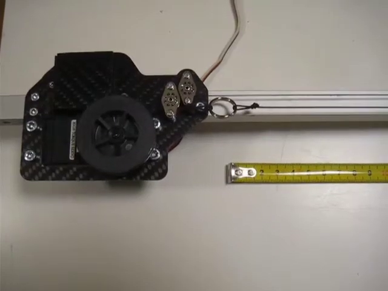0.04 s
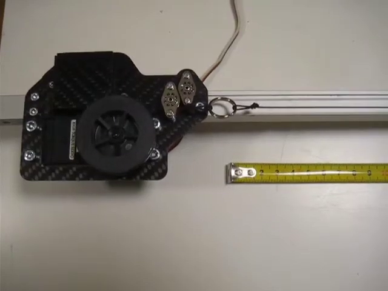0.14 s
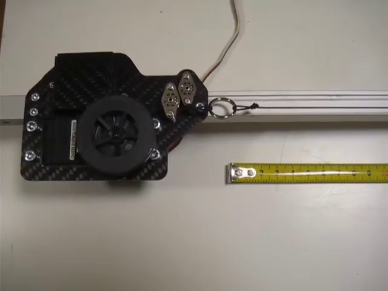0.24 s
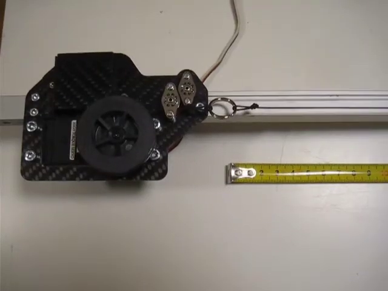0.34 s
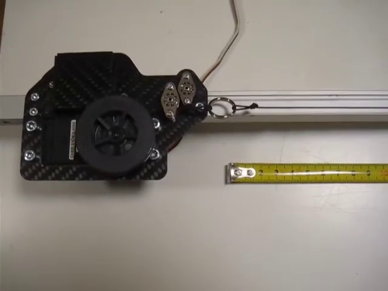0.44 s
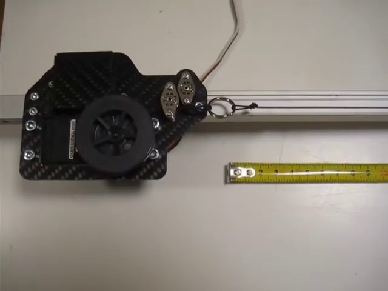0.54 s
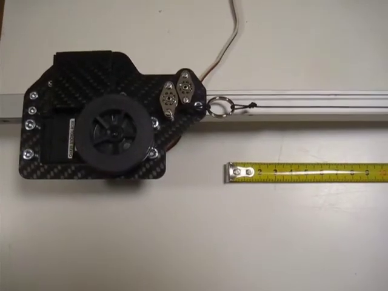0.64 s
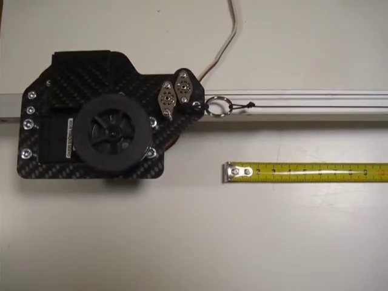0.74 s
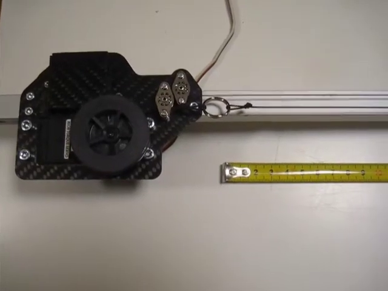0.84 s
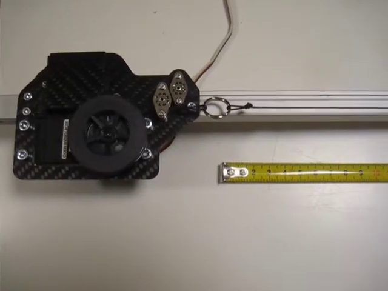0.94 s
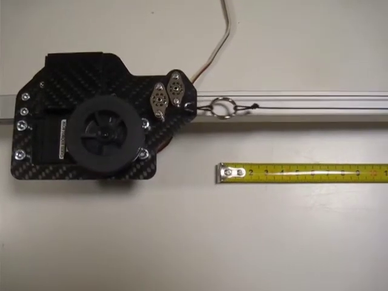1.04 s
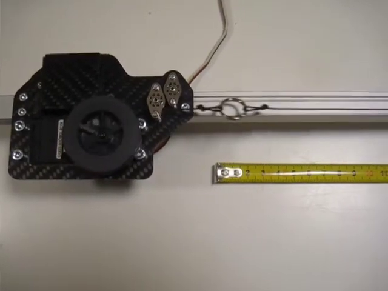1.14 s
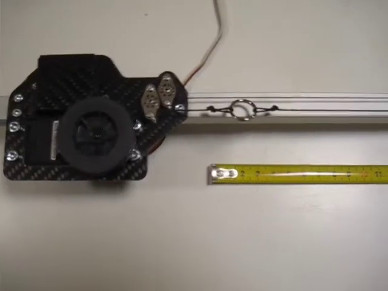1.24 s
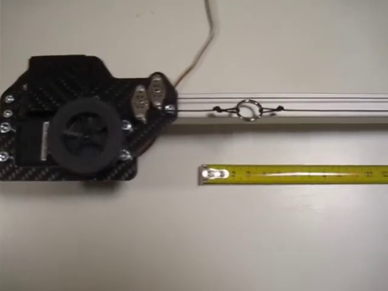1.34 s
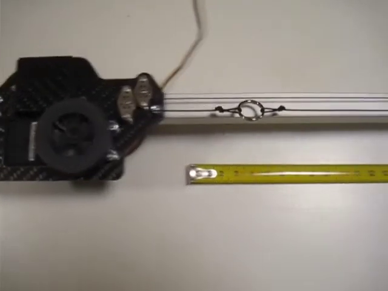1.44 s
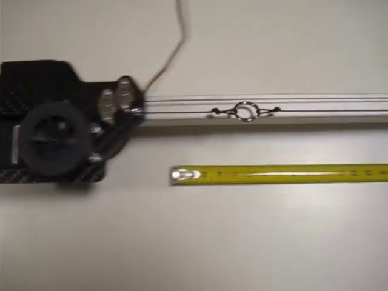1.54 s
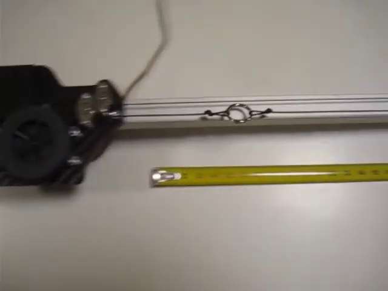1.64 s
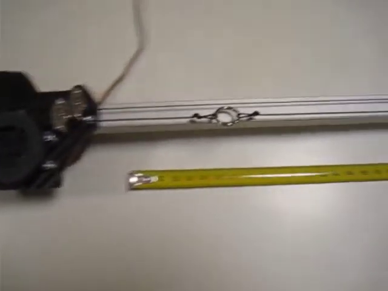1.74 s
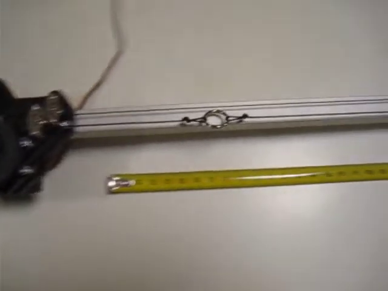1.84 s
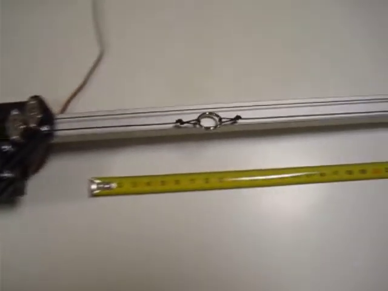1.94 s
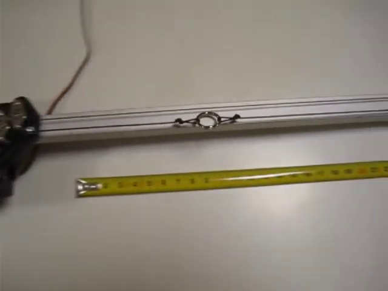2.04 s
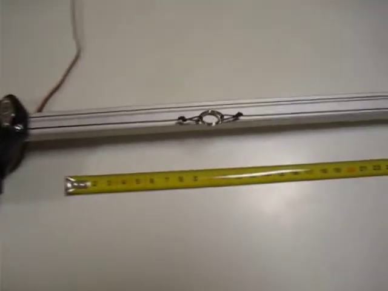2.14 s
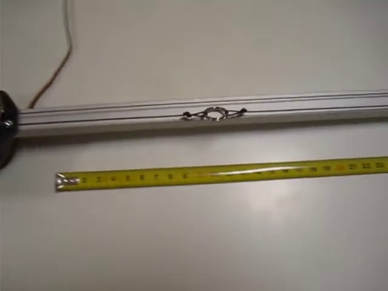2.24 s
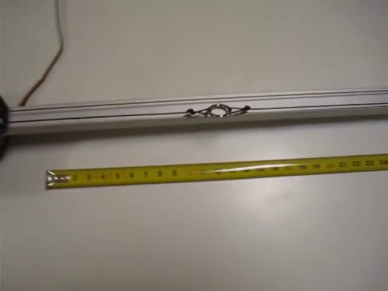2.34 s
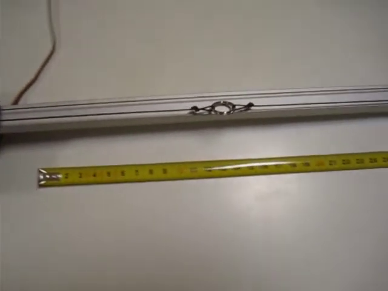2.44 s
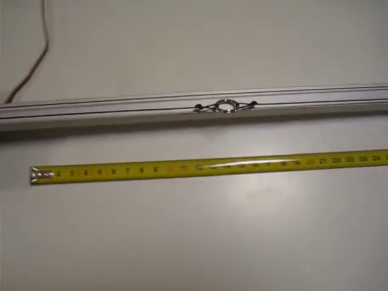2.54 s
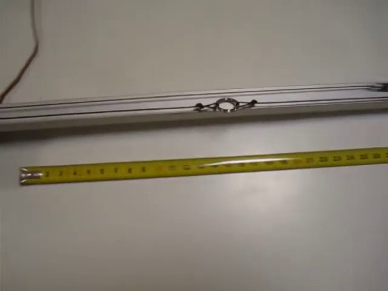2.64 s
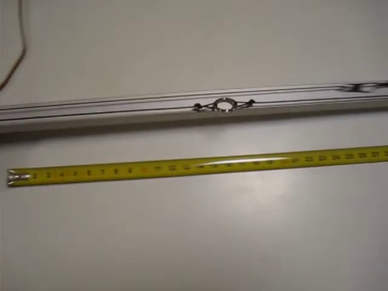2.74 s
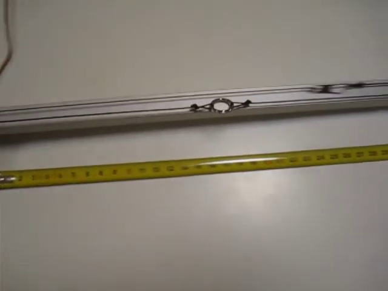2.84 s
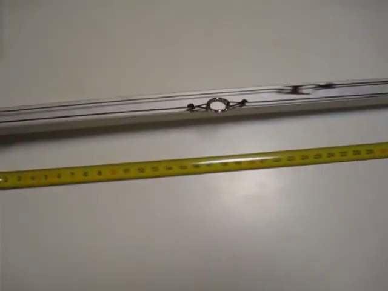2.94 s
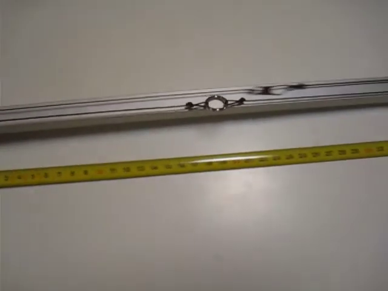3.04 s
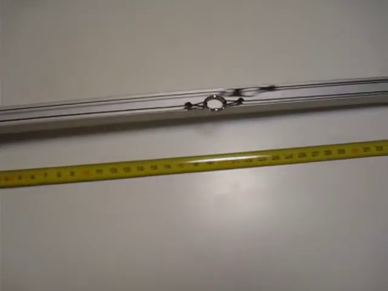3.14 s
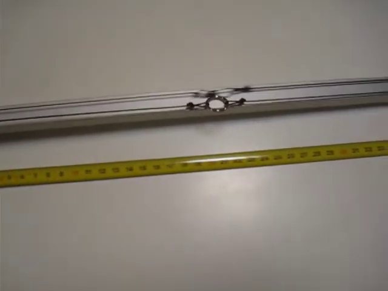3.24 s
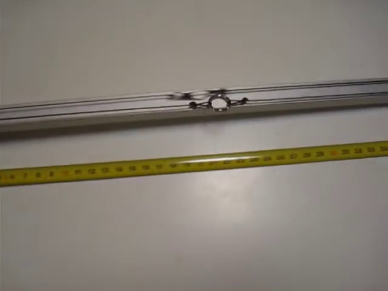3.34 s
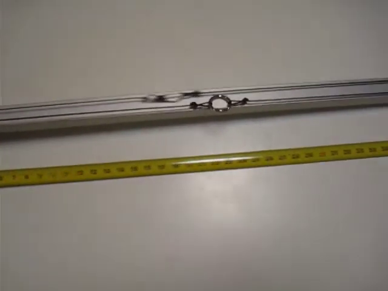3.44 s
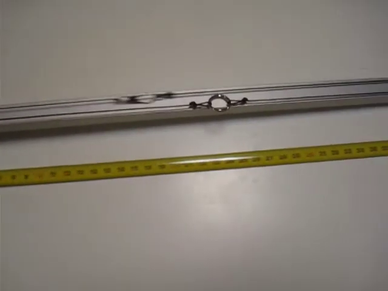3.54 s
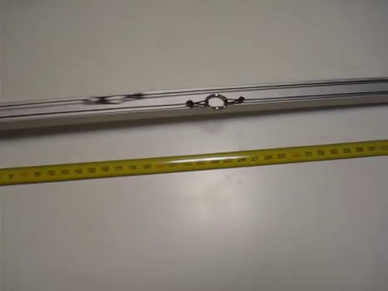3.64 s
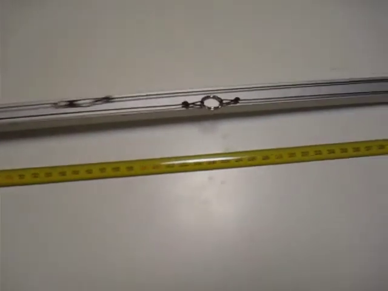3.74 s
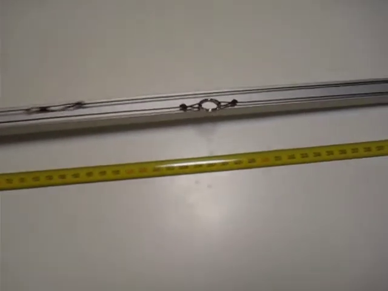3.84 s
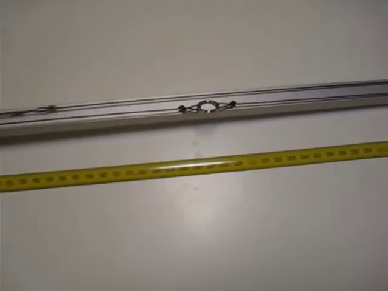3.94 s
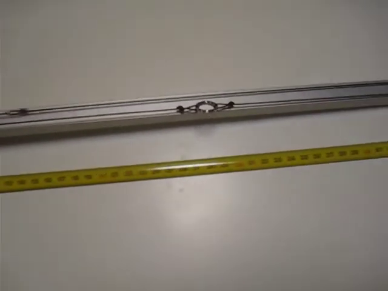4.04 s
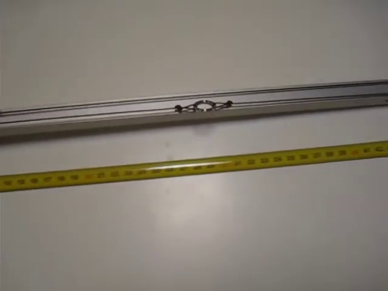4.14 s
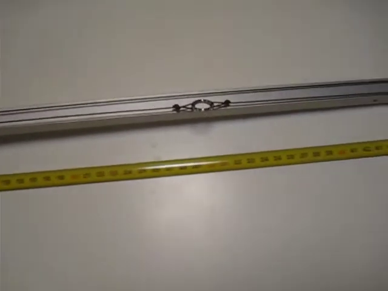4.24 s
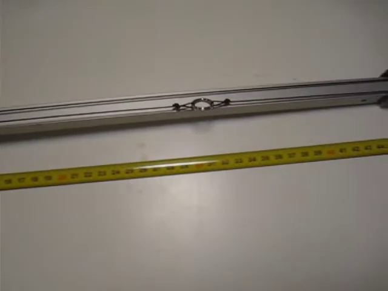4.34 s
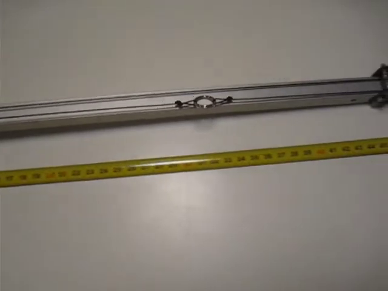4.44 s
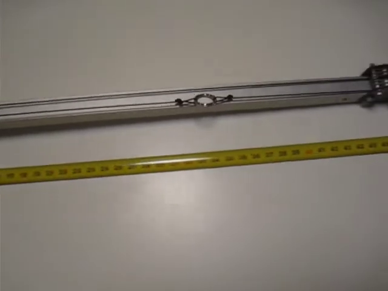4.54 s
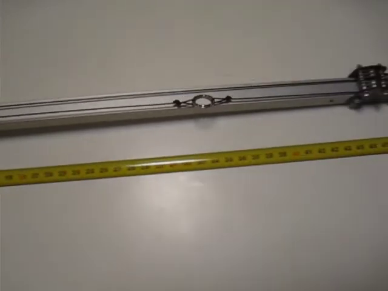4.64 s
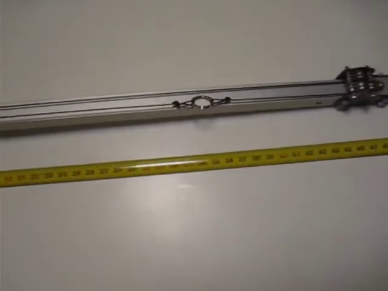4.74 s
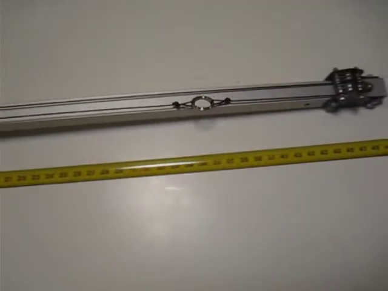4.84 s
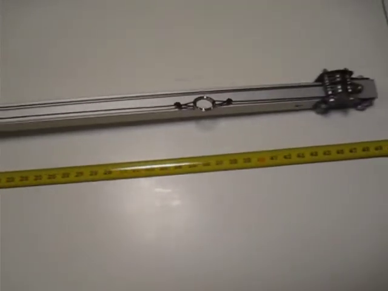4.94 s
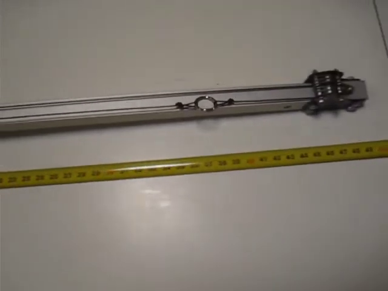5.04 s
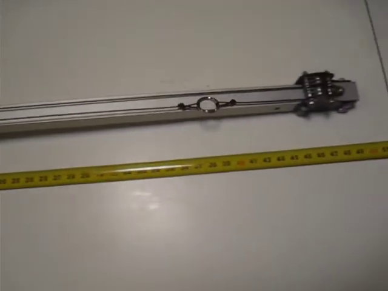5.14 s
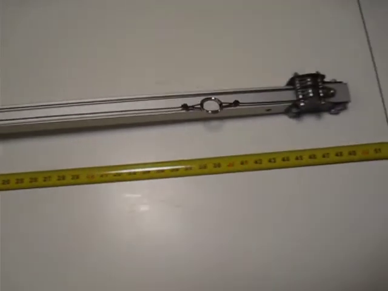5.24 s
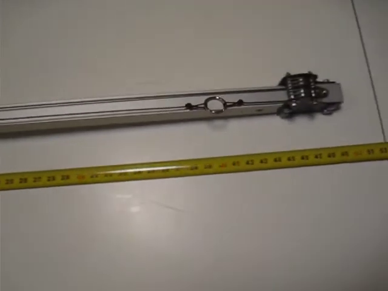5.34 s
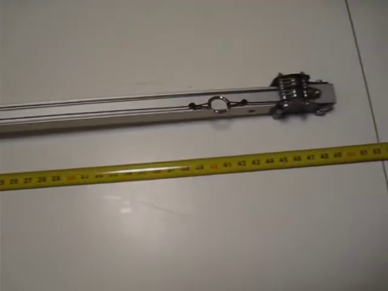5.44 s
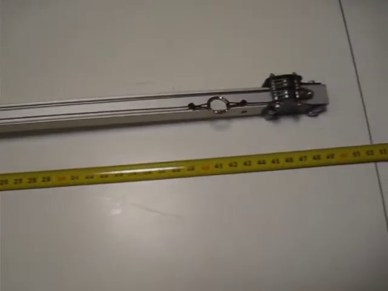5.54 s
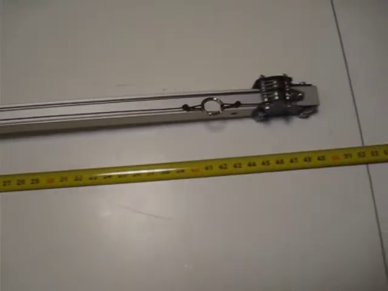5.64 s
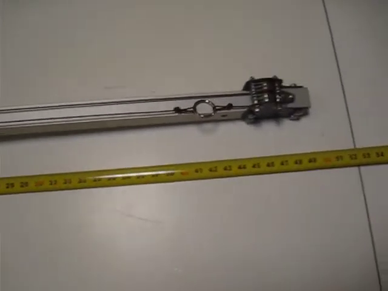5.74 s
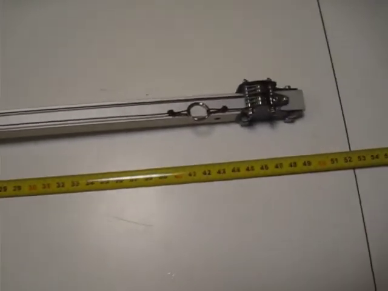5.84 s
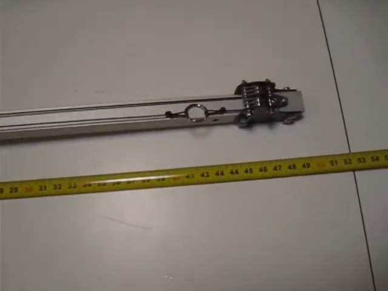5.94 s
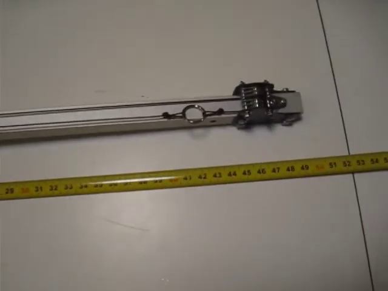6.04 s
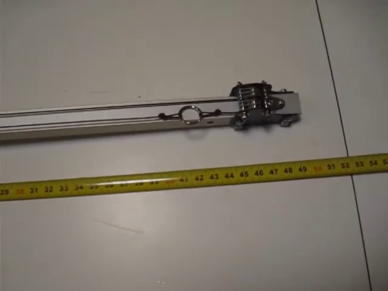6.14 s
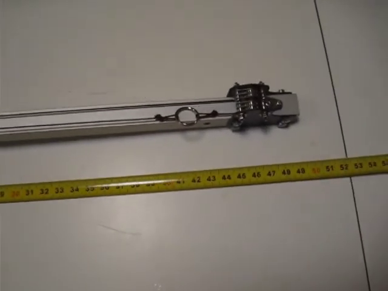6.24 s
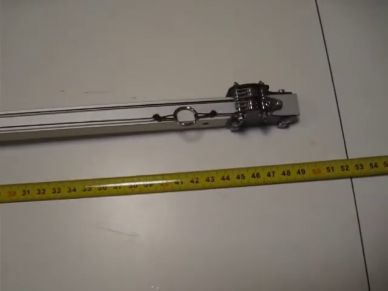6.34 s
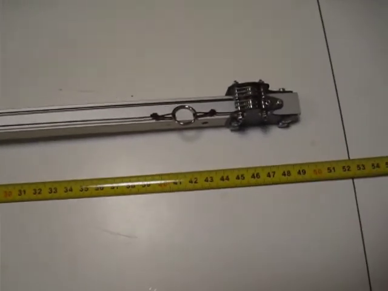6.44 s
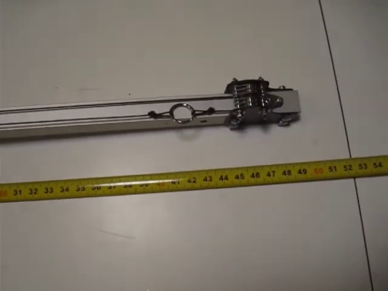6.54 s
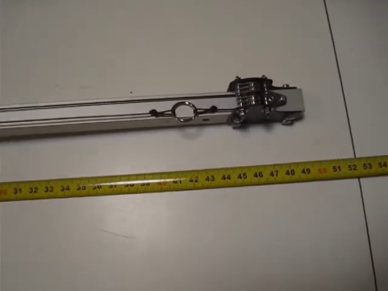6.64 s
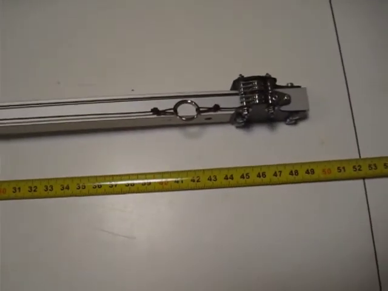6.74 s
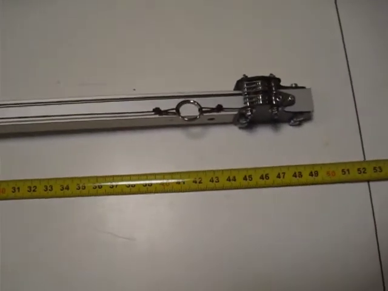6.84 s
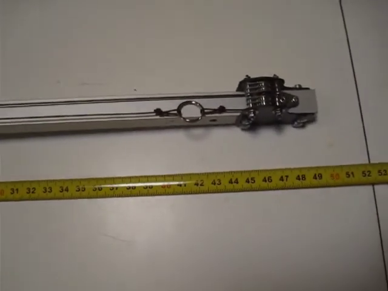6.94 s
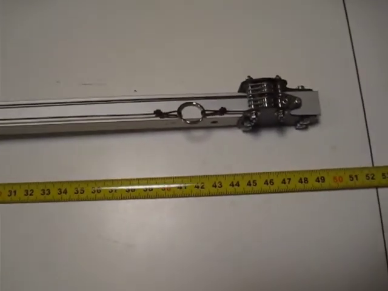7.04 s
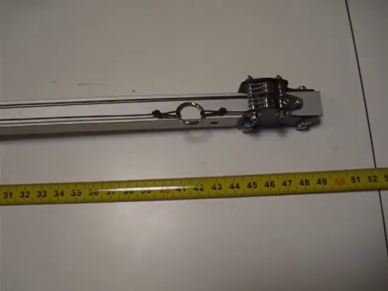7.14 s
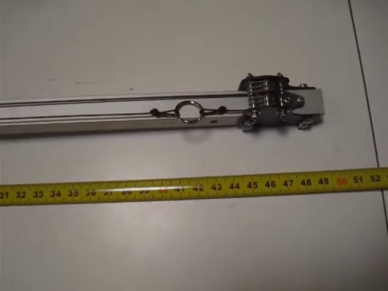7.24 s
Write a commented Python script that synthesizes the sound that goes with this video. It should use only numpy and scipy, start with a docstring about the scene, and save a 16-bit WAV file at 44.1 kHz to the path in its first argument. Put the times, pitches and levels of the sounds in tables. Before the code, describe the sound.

Close indoor sound of a small geared motor: near silence with faint ticking, a sudden start with an upward sweep and a burst of gear snaps, then a steady gritty rattle with a shrill whine and light hum, ringing through an aluminium rail. The tone shifts gently as the microphone moves along it. The motor coasts down quickly, and a tightened line ticks sparsely in its pulleys over quiet room hiss.

```python
"""A small geared electric winch on an aluminium rail spins up, hauls a line for about four seconds and coasts.
Its rotor hums and whines as sine tones tied to its speed; its gear teeth rattle as random knocks
that ring the rail and frame, while a microphone travels along the rail above a table.
A lens ticks, burrs and faint swishes pass before the start; the tightened line ticks in its pulleys afterwards.
Filtered noise makes the soft room hiss and its wavering fan tones."""
import sys
import numpy as np
from scipy import signal
from scipy.fft import rfft, irfft
from scipy.io import wavfile
from scipy.ndimage import uniform_filter1d

SR = 44100
rng = np.random.default_rng(int(sys.argv[2]) if len(sys.argv) > 2 else 0)


def unload_wav(signal):
    """Save mono or channel-first audio to the path in sys.argv[1] as 16-bit WAV at rate SR, clipped to [-1, 1]."""
    wavfile.write(
        sys.argv[1],
        SR,
        np.round(np.clip(np.atleast_2d(signal).T, -1, 1) * 32767).astype(np.int16),
    )


N = 321048
TIME = np.arange(N) / SR  # seconds

# moments in seconds: motor on, gears engage, power cut
ON_S, ENGAGE_S, OFF_S = 0.8875, 0.932, 5.31


def from_db(db):
    """Turn decibels into a gain."""
    return 10 ** (np.asarray(db) / 20)


def rms_one(x):
    """Scale a sound to an rms (average strength) of 1."""
    return x / np.sqrt(np.mean(x ** 2) + 1e-20)


def since(s):
    """Seconds gone by since time s; zero before it."""
    return np.maximum(TIME - s, 0)


def plateau(middle, half_length):
    """A curve near 1 around the middle, with soft edges that pass 1/2 at the half length."""
    return 1 / (1 + ((TIME - middle) / half_length) ** 8)


def nearness(s, passing_s=0.44):
    """Rises to 1 as the travelling microphone passes a loud spot at time s."""
    return 1 / (1 + ((TIME - s) / passing_s) ** 2)


def dying(start, t60):
    """Envelope of a blow: it starts at once and falls by 60 dB in t60 seconds."""
    age = TIME - start
    return (age >= 0) * from_db(-60 * np.clip(age / t60, 0, 4))


def drift(rate_hz):
    """Slow random wandering with spread 1, made from smoothed noise."""
    step = 40  # samples between the points of the slow curve
    r = np.exp(-2 * np.pi * rate_hz * step / SR)
    noise = rng.standard_normal(N // step + 2002)
    slow = signal.lfilter([1], [1, -2 * r, r * r], noise)[2000:]  # skip the filter's start
    return np.interp(np.arange(N) / step, np.arange(len(slow)), rms_one(slow))


def colour(x, spectrum):
    """Filter through the points of a spectrum without any sound ahead of the blow (minimum phase)."""
    size = 2 ** 12
    hz, db = np.transpose(spectrum)
    grid = np.maximum(np.arange(size // 2 + 1) * SR / size, 1)
    gain = from_db(np.interp(np.log(grid), np.log(hz), db))
    # folding the cepstrum onto positive times gives the minimum-phase filter
    cepstrum = irfft(np.log(gain))
    cepstrum[1:size // 2] *= 2
    cepstrum[size // 2 + 1:] = 0
    return signal.fftconvolve(x, irfft(np.exp(rfft(cepstrum))))[:N]


def resonance(x, hz, width_hz):
    """A single resonance: a band-pass filter with gain 1 at its top."""
    r = np.exp(-np.pi * width_hz / SR)
    feed = np.array([1, 0, -1]) * (1 - r * r) / 2
    ring = [1, -2 * r * np.cos(2 * np.pi * hz / SR), r * r]
    return signal.lfilter(feed, ring, x + 1e-18)


def noise_band(noise, hz, width_hz):
    """Noise sent twice through the same resonance, with an rms of 1."""
    return rms_one(resonance(resonance(noise, hz, width_hz), hz, width_hz))


def rotor_speed(half_speed_s=1.02, run_up_s=.082, coast_s=.185):
    """Turns per second: an S-shaped run-up, a haul that wavers very slightly, then coasting."""
    # rotor speed while hauling, creeping up as the line winds in [t/s, speed/turns per s]
    cruise_speed = [(1.5, 219.4), (1.8, 220.4), (3.65, 220.8), (4.7, 222)]
    s, turns_per_s = np.transpose(cruise_speed)
    cruise = np.interp(TIME, s, turns_per_s) * (1 + .0009 * drift(4))
    run_up = 1 / (1 + np.exp((half_speed_s - TIME) / run_up_s))
    coast = 1 / np.sqrt(1 + (since(OFF_S) / coast_s) ** 4)
    return cruise * run_up * coast


def drive(switch_rise_s=0.0069, fade_s=5.575, steep_s=5.71, fade_db_per_s=34, steep_db_per_s=149):
    """Gain of the whole drive: rising at the switch, eased while slack, held, then released."""
    # the gears overrun the line and run slack [middle t/s, half length/s, level/dB]
    slack = (1.222, 0.083, -2.5)
    middle, half_length, slack_db = slack
    switch = np.minimum(since(ON_S) / switch_rise_s, 1)
    # the fade steepens late in the coasting
    release_db = fade_db_per_s * since(fade_s) + steep_db_per_s * since(steep_s)
    return switch * from_db(slack_db * plateau(middle, half_length) - release_db)


def gears(speed, turns, contacts_per_turn=26, spread_db=3.5, flutter_db=0.58, rub=0.25):
    """Random tooth contacts of uneven strength, pressed harder once in each turn of every wheel."""
    # wheels slightly out of true [turns per rotor turn, swing of the rattle/dB]
    wheels = [(.0497, .8), (.1125, .7), (.1395, .6), (.2018, .7), (.2516, .7), (1, 1.6), (2, 1.1)]
    chance = contacts_per_turn * speed / SR  # of a contact in each sample
    sizes = from_db(spread_db * np.clip(rng.standard_normal(N), -3, 1.6))
    hits = (rng.random(N) < chance) * sizes * rng.choice([-1, 1], N)
    force = hits / np.sqrt(chance) + rub * rng.standard_normal(N)
    press_db = sum(swing_db * np.sin(2 * np.pi * (ratio * turns + rng.random()))
                   for ratio, swing_db in wheels)
    return parts(force * from_db(press_db + flutter_db * drift(60)), speed)


def parts(force, speed, strain_s=0.19):
    """Rail, frame, gearbox and teeth radiate their own ranges, changing with distance, torque and speed."""
    # range of each part [low f/Hz, high f/Hz]
    ranges = [(140, 2100), (2100, 4200), (4200, 6100), (6100, 16000)]
    # rattle of each part [level/dB, passing t/s, half width/s, swell/dB,
    # lift under starting torque/dB, change at standstill/dB]
    part_levels = [(-37.5, 4.94, 1.62, 6.5, 2, 3), (-24.5, 5.29, 0.2, 4, 7, -3.5),
                   (-25.5, 1.26, 0.34, 4, 7, -4.5), (-28, 3.47, 2.75, 4.5, 3.5, -11.5)]
    sound = reflections(body(force))
    strain = plateau(ENGAGE_S, strain_s)  # starting torque presses the teeth together
    slowness = 1 - speed / speed.max()
    out = 0
    for edges, (db, s, half_width, swell_db, strain_db, slow_db) in zip(ranges, part_levels):
        band = signal.butter(6, edges, "band", fs=SR, output="sos")
        part = signal.sosfiltfilt(band, sound)
        # even out the slow changes of level so that the table sets them
        part = part / np.sqrt(uniform_filter1d(part ** 2, size=SR // 3) + 1e-18)
        level_db = db + swell_db * nearness(s, half_width) + strain_db * strain + slow_db * slowness
        out = out + part * from_db(level_db)
    return out


def body(force):
    """Rail and frame colour every contact and ring at their resonances."""
    # broad colour of the rattle [f/Hz, relative level/dB per Hz]
    rattle = [(180, -28), (340, -30), (430, -16), (1000, -15.5), (1550, -14.5), (2100, -12), (2700, -2),
              (4800, 7), (5850, 2), (6200, -6), (6700, -1), (9600, -4), (11300, -7), (12200, -14),
              (13000, -29.5)]
    # resonances that change as the microphone passes their loud spots
    # [f/Hz, width/Hz, lift/dB, passing t/s, swell/dB]
    modes = [(428, 53, 4.5, 5.46, 6.5), (708, 73, 5.5, 6.6, 28), (940, 95, 2, 4.76, 6),
             (1203, 24, 7, 4.67, 4.5), (1362, 34, 2, 1.37, 10.5), (1854, 170, 8.5, 5.2, -3.5),
             (2040, 46, 0, 5.86, 12), (2340, 180, 5.5, 2.45, 6.5), (2798, 230, 6.5, 2.9, 2.5),
             (2930, 93, -3.5, 4.56, 14), (3110, 100, -1, 0.92, 13), (3284, 94, 4.5, 2.2, 0.5),
             (3663, 35, 0.5, 5.3, 9), (3690, 160, 3, 3.2, 4), (4200, 120, 0.5, 2.43, 2.5),
             (4640, 310, -7, 1.92, 18.5), (4840, 180, -1, 1.16, 10), (5450, 390, -7.5, 1.9, 16),
             (5494, 370, 4.5, 1.36, 3.5), (6760, 260, 4, 2.7, 1), (8560, 190, 3, 7.1, -1.5),
             (10520, 130, 5, 1.7, 4.5)]
    rings = 0
    for hz, width_hz, lift_db, s, swell_db in modes:
        extra = from_db(lift_db + swell_db * nearness(s)) - 1
        rings = rings + extra * resonance(force, hz, width_hz)
    return colour(force + rings, rattle)


def reflections(x, echo_gain=0.088, scatter_gain=0.11, count=4):
    """Echoes off tabletop, rail and nearby things cut combs that slide as the microphone moves."""
    # paths by way of tabletop and rail [delay at time zero/ms, shrinking/ms per s]
    paths = [(.92, .017), (1.53, .088), (2.25, .04)]
    delays = [(ms - ms_per_s * TIME) / 1000 for ms, ms_per_s in paths]
    out = x + echo_gain * sum(np.interp(TIME - delay, TIME, x) for delay in delays)
    for stretch, echo_sign in zip(rng.uniform(1.5, 7, count), rng.choice([-1, 1], count)):
        arrival = TIME - stretch * delays[1] - 4e-5 * drift(.5)
        out = out + scatter_gain * echo_sign * np.interp(arrival, TIME, x)
    return out


def whine(speed, turns, overall_db=-16.0, waver_db=1.5):
    """Mesh tones sing only near full speed; each wavers slowly by itself, its phase jittering at random."""
    # gear tones [multiple of rotor speed, relative level/dB, passing t/s, swell/dB]
    mesh_tones = [(14, -21.5, 2.1, 5), (15, -18.5, 4.5, 3.5), (22, -20, 1.7, 2), (27, -37, 1.55, 10),
                  (28, -21.5, 1.1, 11), (29, -21.5, 3.24, 2.5), (51, -45, 2, 16)]
    tones = 0
    for order, db, s, swell_db in mesh_tones:
        phase_jitter = .4 * drift(9) + .45 * drift(70)
        level = from_db(db + swell_db * nearness(s) + waver_db * drift(0.71))
        tones = tones + level * np.sin(2 * np.pi * order * turns + phase_jitter)
    return from_db(overall_db) * np.sqrt(2) * tones * (speed / speed.max()) ** 8


def hum(speed, turns, waver_db=1.06, judder_db=3.5, brake_s=.1):
    """Clean low orders of the rotor; they judder while it runs up or coasts, and boom in the mount."""
    # rotor unbalance and commutation [multiple of rotor speed, level before the mount/dB, passing t/s,
    # half width/s, change at standstill/dB, change while braking/dB]
    orders = [(1, -45.5, 1.9, 5.1, -21, 3.5), (3, -44, 3.5, 1.3, -4.5, 4), (4, -42.5, 4.9, 1.56, -15, -6.5)]
    # the motor mount booms as an order sweeps through it [f/Hz, width/Hz, gain of the added ring/dB]
    mount = (412, 50, 14.5)
    braking = np.minimum(since(OFF_S) / brake_s, 1)
    slowness = 1 - speed / speed.max()
    tones = 0
    for order, db, s, half_width, slow_db, brake_db in orders:
        level_db = db + slow_db * slowness + brake_db * braking + waver_db * order * drift(8.2)
        slip = .09 * drift(18)
        tone = np.sin(order * (2 * np.pi * turns + slip))
        tones = tones + nearness(s, half_width) * from_db(level_db) * tone
    unsteady = np.clip(4 * slowness, 0, 1)
    tones = np.sqrt(2) * tones * from_db(judder_db * unsteady * drift(25))
    mount_hz, width_hz, mount_db = mount
    tones = tones + from_db(mount_db) * resonance(tones, mount_hz, width_hz)
    # the narrow rail radiates almost no deep bass
    return signal.sosfilt(signal.butter(4, 155, "high", fs=SR, output="sos"), tones)


def bite(t60=1.0):
    """The first torque sets the frame groaning: bands of noise that die away."""
    # the frame as the motor first bites [f/Hz, width of each filter pass/Hz, starting level/dB]
    groans = [(421.5, 12, -45), (1830, 450, -34), (3230, 250, -38), (5430, 830, -40)]
    force = rng.standard_normal(N)
    groan = sum(from_db(db) * noise_band(force, hz, width) for hz, width, db in groans)
    return dying(ON_S, t60) * groan


def snaps(level_db=-6, t60=.04):
    """Teeth snap through their play: each chatters home in a short burst that rings the body."""
    # snaps [t/s, relative level/dB]
    snap_times = [(0.902, -19), (1.0327, 0), (1.065, -3), (1.108, -3), (1.132, -1), (1.168, -4.5),
                  (1.179, -1.5), (1.2092, -4), (1.23, 1.5), (1.248, -5), (1.255, -0.5), (2.8193, -7),
                  (4.2664, 3), (4.77, 0), (4.835, 2), (5.3008, 0.5), (5.466, -2.5), (5.553, -4.5)]
    force = sum(from_db(db) * dying(s, t60) for s, db in snap_times) * rng.standard_normal(N)
    high_pass = signal.butter(4, 450, "high", fs=SR, output="sos")
    return from_db(level_db) * signal.sosfilt(high_pass, body(force))


def line_ticks(crack_t60=0.026, ring_t60=0.034, crack_db=-7):
    """Each slip of the settling line is a dry crack and a short ring of the pulley."""
    # slips [t/s, level/dB, ring f/Hz, ring level relative to the slip/dB]
    slips = [(5.815, -22, 5900, -12), (5.8722, -31, 4600, -20), (5.93, -28.5, 3930, -11),
             (6.016, -27.5, 3800, 0), (6.251, -34, 3820, -9), (6.3391, -36.5, 3830, -6),
             (6.825, -36, 4900, -6), (6.8793, -36, 2570, -9), (6.9713, -29.5, 4450, -15),
             (7.239, -32.5, 4360, -8)]
    # colour of the crack [f/Hz, relative level/dB]
    crack_colour = [(300, -6), (1500, -4), (3500, -0.5), (5800, -1), (7500, -10), (9500, -4), (12500, -21)]
    crack = from_db(crack_db) * rms_one(colour(rng.standard_normal(N), crack_colour))
    out = 0
    for s, db, hz, ring_db in slips:
        ring = from_db(ring_db) * dying(s, ring_t60) * np.sin(2 * np.pi * hz * (TIME - s))
        out = out + from_db(db) * (crack * dying(s, crack_t60) + ring)
    return out


def lens_ticks(level_db=-1, scrape_db=-17, scrape_t60=0.013):
    """Three quick contacts per focus step ring the lens barrel, with a short scrape of noise."""
    # focus steps [t/s, relative level/dB]
    steps = [(0.0632, -23), (0.135, -22.5), (0.2232, -23), (0.423, -23), (0.7107, -23)]
    # contacts within a step [t after its start/s, relative level/dB]
    beats = [(.0005, -5), (.004, -2.5), (.0072, 0)]
    # ringing of the barrel [f/Hz, relative level/dB, time to fall 60 dB/s]
    barrel_modes = [(1280, -13, 0.023), (1545, -10.5, 0.048), (1910, -13, 0.018), (3040, -8, 0.017),
                    (3750, -19, 0.028), (4490, -9.5, 0.017), (5710, -10, 0.013), (8360, -13, 0.008)]
    clicks, age = np.zeros(N), TIME[:SR // 10]
    for s, db in steps:
        for lag, beat_db in beats:
            clicks[int((s + lag) * SR)] += from_db(db + beat_db + level_db)
    barrel = 0
    for k, (hz, db, t60) in enumerate(barrel_modes):
        mode = from_db(db - 60 * age / t60) * np.sin(2 * np.pi * hz * age)
        barrel = barrel + mode * (-1) ** k  # alternate signs
    scrape = noise_band(rng.standard_normal(len(age)), 4200, 6000)
    scrape = scrape * from_db(scrape_db - 60 * age / scrape_t60)
    return signal.fftconvolve(clicks, barrel + scrape)[:N]


def focus_hum(width_hz=25):
    """The lens motor burrs faintly for a while: a narrow band of low noise."""
    # burr of the lens motor [middle t/s, half length/s, f/Hz, level/dB]
    motor_burr = (.5, .26, 115, -59)
    middle, half_length, hz, db = motor_burr
    return from_db(db) * noise_band(rng.standard_normal(N), hz, width_hz) * plateau(middle, half_length)


def swishes(hz=9000, width_hz=5000):
    """Brief, faint swishes in the treble: short stretches of high noise."""
    # swishes before the start [middle t/s, half length/s, level/dB]
    swish_times = [(.58, 0.016, -59), (.705, .018, -54)]
    hiss = noise_band(rng.standard_normal(N), hz, width_hz)
    return hiss * sum(from_db(db) * plateau(middle, half_length) for middle, half_length, db in swish_times)


def room(x, t60=0.42, wet_db=-13):
    """A faint diffuse tail from the walls: the sound smeared over fading noise."""
    age = TIME[:SR // 2]
    tail = rng.standard_normal(len(age)) * from_db(-60 * age / t60) * (age > .006)
    tail = tail / np.sqrt(np.sum(tail ** 2))
    return x + from_db(wet_db) * signal.fftconvolve(x, tail)[:N]


def room_air(hiss_db=-50):
    """Soft coloured hiss with a few wavering fan tones made of narrow noise bands."""
    # colour of the room hiss [f/Hz, relative level/dB per Hz]
    air = [(30, -11.5), (90, -9.5), (150, -7.5), (260, -4.5), (480, -6.5), (700, -6.5), (1000, -3.5),
           (1500, -8), (3000, -11.5), (6000, -17), (8000, -19), (11500, -27), (13000, -40)]
    # fan tones [f/Hz, width of each filter pass/Hz, level/dB]
    fan_tones = [(122.3, 24, -70.5), (167, 2.2, -65.5), (972, 17, -63), (2870, 6, -69.5)]
    tones = sum(from_db(db) * noise_band(rng.standard_normal(N), hz, width) for hz, width, db in fan_tones)
    return from_db(hiss_db) * rms_one(colour(rng.standard_normal(N), air)) + tones


def scene(free_play_db=-17, attack_s=0.022):
    """The rotor's speed drives hum, whine and rattle together."""
    speed, running = rotor_speed(), drive()
    turns = np.cumsum(speed) / SR
    # rattle and whine stay quieter until the gears engage
    free_play = np.clip(.5 + (ENGAGE_S - TIME) / attack_s, 0, 1)
    engaged = from_db(free_play_db * free_play)
    winch = running * (bite() + engaged * (gears(speed, turns) + whine(speed, turns))) + snaps()
    sound = room(winch + line_ticks()) + running * hum(speed, turns)
    return (sound + lens_ticks() + focus_hum() + swishes() + room_air())[None]


def record(dry, threshold_db=-13, release_db_per_s=130, cutoff_hz=13200):
    """A quick limiter turns down what passes the threshold, then recovers; the top treble is cut."""
    level_db = 10 * np.log10(uniform_filter1d(dry[0] ** 2, size=130) + 1e-12)
    # hold the largest excess, letting it shrink at the release rate
    recovery = release_db_per_s * TIME
    duck_db = np.maximum.accumulate(np.maximum(level_db - threshold_db, 0) + recovery) - recovery
    limited = dry * from_db(-uniform_filter1d(duck_db, size=60))
    low_pass = signal.ellip(10, .2, 80, cutoff_hz, fs=SR, output="sos")
    return signal.sosfilt(low_pass, limited)


dry = scene()
out = record(dry)
unload_wav(out)
```